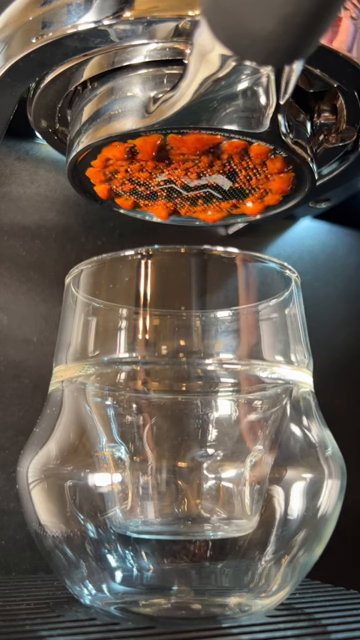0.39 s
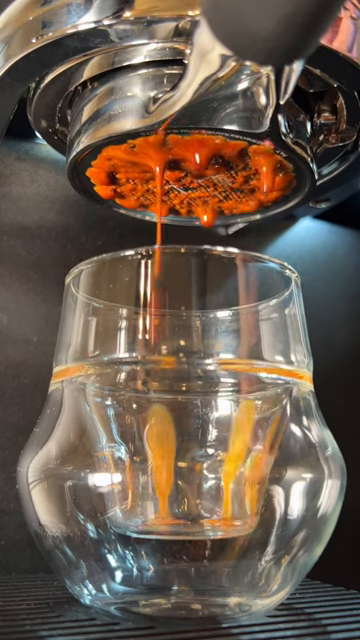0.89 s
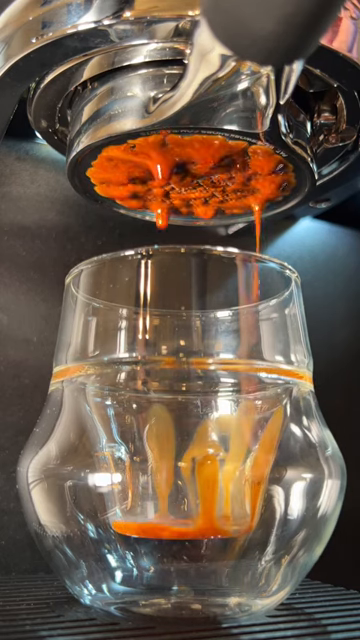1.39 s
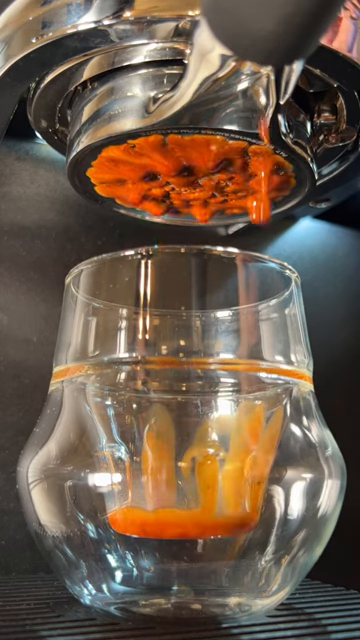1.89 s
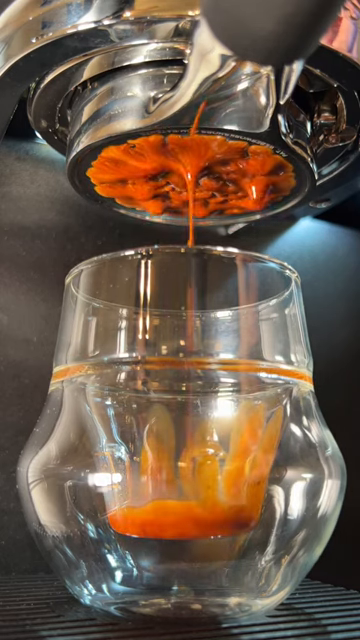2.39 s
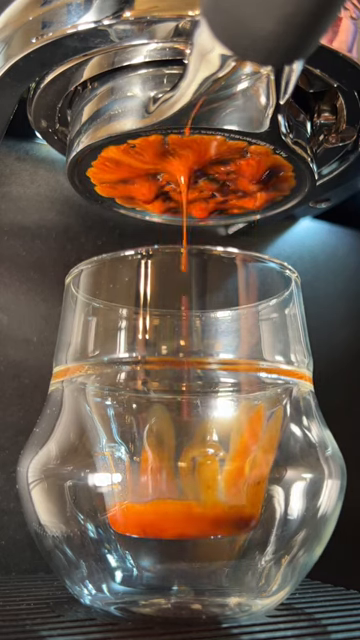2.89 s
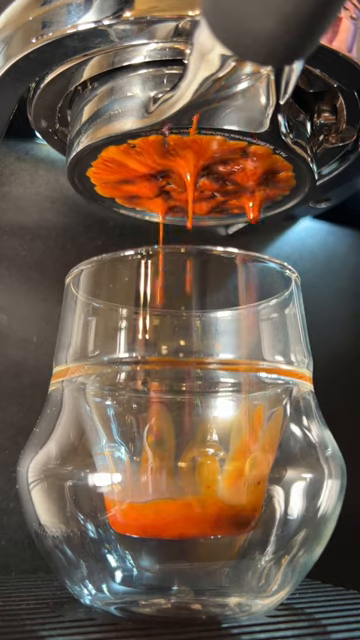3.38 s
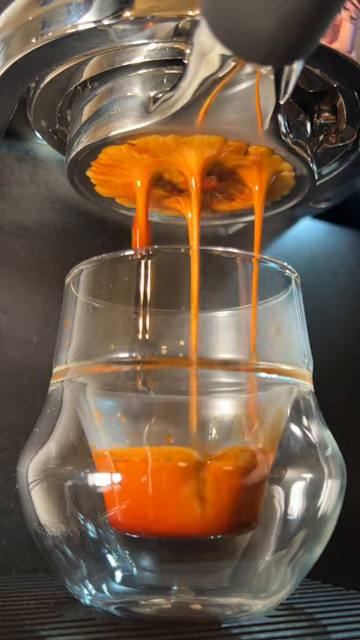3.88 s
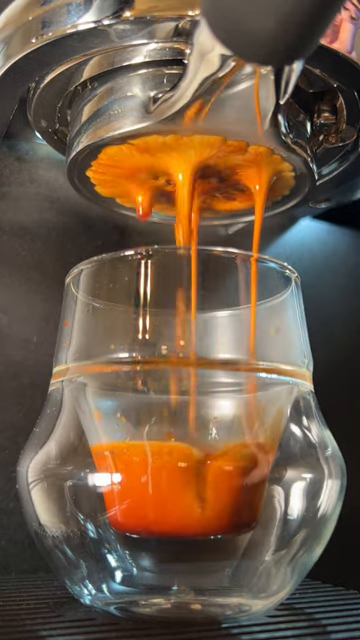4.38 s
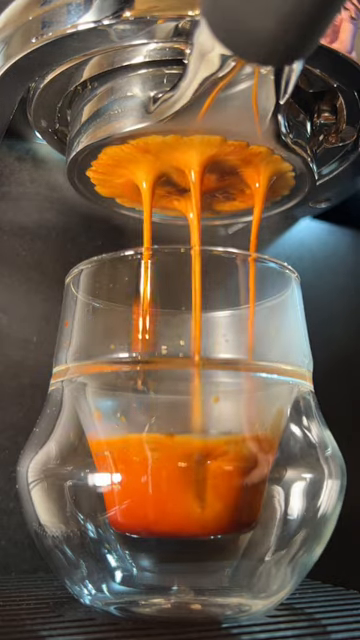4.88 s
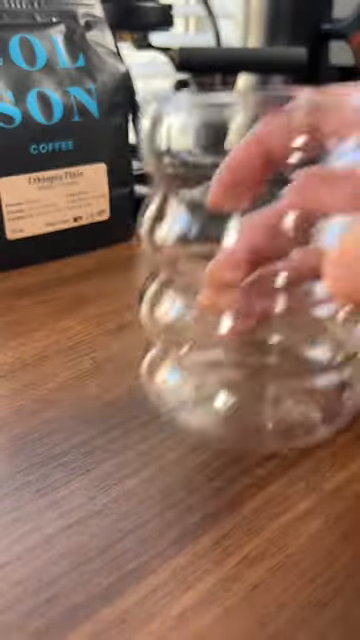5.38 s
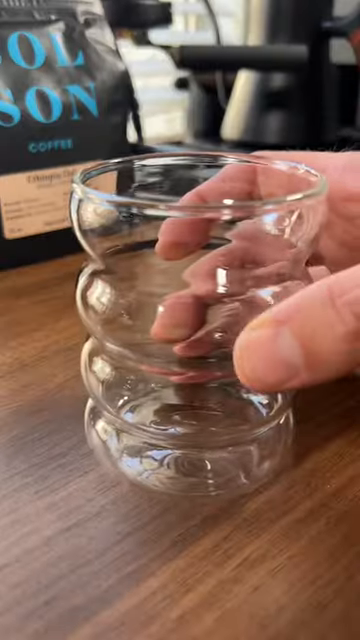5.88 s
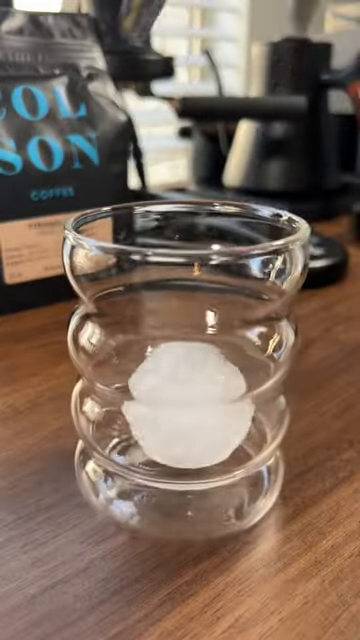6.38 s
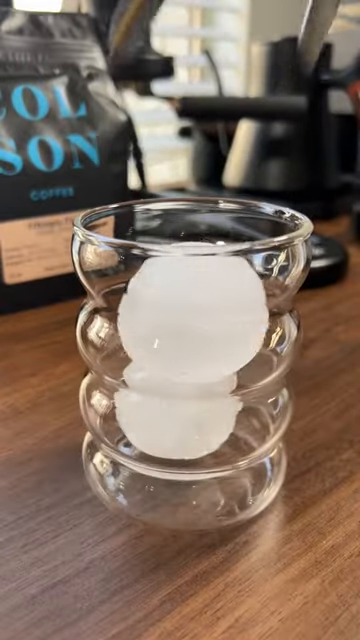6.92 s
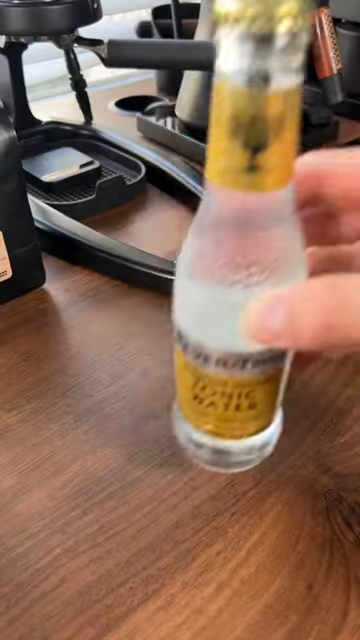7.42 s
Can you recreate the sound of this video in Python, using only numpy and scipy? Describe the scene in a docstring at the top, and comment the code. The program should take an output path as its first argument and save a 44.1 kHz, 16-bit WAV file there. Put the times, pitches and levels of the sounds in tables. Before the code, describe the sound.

An espresso pump drones close by, a wavering low hum with a throbbing metallic hiss and soft rumble, while coffee drips ring a cup. A hard cut leads to a quiet kitchen: an empty glass thumps onto a wooden table, then two ice balls drop in with loud thuds, glassy clinks, cracks and crunch. Finally only faint room air remains.

```python
"""Close to a mains-driven espresso pump, in three shots of differing tone: wavering hum, throbbing casing hiss, low
rumble, and drips ringing a cup. At 5.29 s a cut leads to a quiet kitchen, with the microphone near a wooden table.
An empty glass is set down and two ice balls are dropped in: blows thud the table modes, ring the glass, crack and
crunch; small contacts make the rolling ice hiss, low puffs of air reach the microphone, and delays return the room
faintly over shaped-noise air. At 7.22 s a last cut leaves only room air of another colour."""
import sys
import numpy as np
from scipy import signal
from scipy.fft import rfft, irfft, next_fast_len
from scipy.io import wavfile
from scipy.ndimage import uniform_filter1d

SR = 44100
rng = np.random.default_rng(int(sys.argv[2]) if len(sys.argv) > 2 else 0)


def rack_gain(trim_db):
    """Turn a fader trim in dB into the linear factor to multiply a signal by."""
    fader = np.asarray(trim_db, float)
    return 10 ** (fader / 20)


def bounce(signal):
    """Save signal as a 16-bit WAV file at the path given by the first command-line argument."""
    frames = np.transpose(np.atleast_2d(signal))
    limited = np.clip(frames, -1, 1)
    pcm = np.round(limited * 32767).astype(np.int16)
    wavfile.write(sys.argv[1], SR, pcm)


N = 332073
CUT_S, LAST_CUT_S = 5.287, 7.219   # the pump scene ends; the glass scene ends
ICE_IN_S = 6.5   # after this the table modes ring shorter and the cracks ring more


def rms_one(x):
    """Scale to rms 1."""
    return x / np.sqrt(np.mean(x ** 2) + 1e-20)


def in_time(rows, silent=-120):
    """Columns of a curve over time, one value a sample; silent is the value outside it (None holds the ends)."""
    s, *columns = np.transpose(rows)
    return [np.interp(np.arange(N) / SR, s, c, left=silent, right=silent) for c in columns]


def at_hz(points, hz):
    """Read a spectrum on a log frequency axis."""
    f, level = np.array(points)[:, :2].T
    return np.interp(np.log(hz), np.log(f), level)


def drift(rate):
    """Slow random wander of spread 1: noise through a two-pole lowpass at rate (Hz), drawn every 40 samples."""
    r = np.exp(-80 * np.pi * rate / SR)
    slow = signal.lfilter([1], [1, -2 * r, r * r], rng.standard_normal(N // 40 + 4002))[4000:]
    return np.interp(np.arange(N) / 40, np.arange(len(slow)), rms_one(slow - slow.mean()))


def ring(force, hz, t60):
    """Resonator: a unit click sets a decaying sine of height 1 ringing."""
    r, w = rack_gain(-60 / (t60 * SR)), 2 * np.pi * hz / SR
    return signal.lfilter([0, np.sin(w)], [1, -2 * r * np.cos(w), r * r], force + 1e-18)


def tint(x, spectrum):
    """Colour a sound by a spectrum, scaled so that white noise keeps its rms."""
    size = x.shape[-1]
    gain = rack_gain(at_hz(spectrum, np.maximum(np.fft.rfftfreq(size, 1 / SR), 1)))
    return irfft(rfft(x) * rms_one(gain), size)


def add(out, s, sound):
    """Mix a sound in at a time (s)."""
    i = round(s * SR)
    out[..., i:i + sound.shape[-1]] += sound[..., :N - i]


# likeness of left and right in spread noise: f/Hz, correlation
LIKENESS = [(30, 1), (300, 0.89), (1000, 0.3), (4000, 0.87), (12000, 0.69)]


def coloured(spectrum):
    """Stereo noise of a given spectrum, less alike left and right at some pitches; rms 1."""
    size = next_fast_len(N)
    hz = np.maximum(np.fft.rfftfreq(size, 1 / SR), 1)
    mid, side = rfft(rng.standard_normal((2, size))) * rack_gain(at_hz(spectrum, hz))
    alike = np.clip(at_hz(LIKENESS, hz), -1, 1)
    both = np.sqrt(1 + alike) * mid + np.sqrt(1 - alike) * side * [[1], [-1]]
    return rms_one(irfft(both, size)[:, :N])


# pump hum: multiple of the stroke rate, relative level/dB
HUM = [(1, -18.5), (2, -20), (3, -22), (4, -3), (5, -0.1), (6, -3.5), (7, -2.5), (8, -11), (9, -41),
       (10, -23), (11, -29), (12, -22.5), (13, -45), (14, -17), (15, -27), (16, -36), (17, -29),
       (18, -38.5), (19, -33), (20, -53), (21, -104), (23, -37), (24, -37)]
# pump load, swinging the hum and in part the hiss: t/s, level/dB
LOAD = [(0.0, 1.5), (0.09, 0), (0.37, -1.5), (0.72, -0.5), (1.26, -0.5), (1.9, -1), (3.3, -1.5),
        (3.8, -0.5), (4.13, 1.5), (4.54, -2), (4.87, 1), (5.28, 0.5)]
# three shots of the pump, each with its own tone: from t/s, then change in level/dB of the 5th, 6th, 7th-11th,
# higher multiples, and hiss
SHOTS = [(0, 1.3, -8, -2, -1.5, 2.8), (0.372, 0.4, -3.1, -2.4, -4, 1.7), (3.88, -2, -8, -9.5, -2, 0.55)]
# colour of the pump hiss as heard, with a steep treble cut above 13 kHz: f/Hz, relative level/dB per Hz
HISS = [(600, -2.5), (1200, -4), (2000, -6.5), (2800, -3), (3600, -3.5), (4900, -10), (6500, -4.5),
        (8300, -4), (10500, -9), (13000, -13), (13300, -30), (14500, -26), (15800, -24), (16100, -60)]
# resonances of the casing: f/Hz, width/Hz (each rings with t60 = 3.5 / width), relative level/dB
CASING = [(1540, 27, 4), (2790, 99, 5), (3263, 65, 7), (4160, 110, -6.5), (4260, 30, -4.5),
          (5880, 130, 1.5), (5530, 16, -31), (6420, 43, -12), (7280, 100, -1), (9000, 310, -13.5),
          (8760, 32, -1), (9000, 47, -14), (9400, 140, -2), (9800, 28, 10), (11500, 72, -13),
          (12200, 280, -6)]


def pump():
    """A piston on the mains: wavering multiples of the stroke rate, a valve tick and throbbing hiss in the casing."""
    stroke_hz, hum_db, hiss_level_db = 59.92, -46, -58.5
    fourth_follows, hiss_follows = 2.37, 0.59   # shares of the load's swing
    whistle_follows = 2.2   # extra swing by shot of the casing's lower resonances
    load_db, = in_time(LOAD, silent=None)
    start_s, *shifts = np.transpose(SHOTS)
    shot = np.searchsorted(start_s, np.arange(N) / SR, "right") - 1
    blended = uniform_filter1d(np.array(shifts)[:, shot], round(0.021 * SR), axis=1)
    fifth_db, sixth_db, middle_db, upper_db, hiss_db = blended
    turn = 2 * np.pi * stroke_hz * np.arange(N) / SR
    hum = np.zeros((2, N))
    own_shift_db = {4: (fourth_follows - 1) * load_db, 5: fifth_db, 6: sixth_db}
    for k, level_db in HUM:
        shift_db = own_shift_db.get(k, upper_db if k > 11 else middle_db * (k > 6))
        start, skew = rng.uniform(0, 2 * np.pi), rng.normal(0, 0.028)   # phases; skew parts left from right
        wobble = 0.18 * drift(3.7) * np.sqrt(k / 5)
        sway_db = (0.91 + 0.62 * (k > 5)) * drift(1.56)
        db = hum_db + level_db + load_db * (k > 3) + shift_db + sway_db
        hum += rack_gain(db) * np.sin(k * turn + start + wobble + skew * np.array([[1], [-1]]))
    throb = 1 + 0.043 * np.cos(turn) + 0.064 * np.cos(2 * turn + 1.9)
    stroke_count = np.floor(turn / (2 * np.pi) + 0.0018 * drift(14))   # slightly uneven timing
    strokes = np.diff(stroke_count, prepend=0) * rack_gain(2.4 * drift(30))
    t = np.arange(900) / SR
    tick_shape = rng.standard_normal(len(t)) * np.exp(-t / 0.012)   # alike on every stroke
    tick = signal.fftconvolve(strokes, tick_shape)[:next_fast_len(N)]
    drive = throb * coloured(HISS) + rack_gain(0.5) * rms_one(tint(tick, HISS))[:N]
    casing = drive.copy()
    for hz, width, db in CASING:
        level_db = db - 0.5 + whistle_follows * hiss_db * (hz < 3500) + 2 * drift(0.75)
        casing += rack_gain(level_db) * ring(drive, hz, 3.5 / width) * np.pi * width / SR
    return hum + rack_gain(hiss_level_db + hiss_db + hiss_follows * load_db + 0.29 * drift(24)) * rms_one(casing)


# drips: t/s, level/dB, favoured pitch f/Hz
DRIPS = [(0.885, -50, 900), (1.032, -45.5, 2060), (1.101, -52.5, 730), (1.251, -41, 676),
         (1.445, -48.5, 760), (1.5, -55, 2000), (1.595, -47, 1200), (1.704, -51, 1200),
         (1.786, -48.5, 1660), (1.867, -45.5, 926), (2.035, -39, 872), (2.08, -46, 940), (2.138, -46, 960),
         (2.231, -49.5, 1210), (2.356, -45, 846), (2.564, -46.5, 840), (2.626, -50.5, 1200),
         (2.712, -48, 700), (2.785, -51.5, 4760), (2.867, -45, 723), (3.028, -41, 810),
         (3.124, -46.5, 1200), (3.234, -45.5, 1220), (3.37, -45, 1170), (3.518, -42, 770),
         (3.637, -44.5, 693), (3.754, -41.5, 680), (3.838, -45, 1083), (3.875, -48, 760),
         (3.947, -49, 1140), (4.005, -55, 1200), (4.274, -45, 1200), (4.68, -48.5, 1200),
         (5.102, -50.5, 790)]
# modes of cup and drip tray: f/Hz, relative level/dB, t60/s
TRAY = [(435.6, 14.5, 0.27), (555, 2, 0.15), (722, 1, 0.11), (872, 3, 0.17), (1090, -29.5, 0.068),
        (1200, 2, 0.25), (1535, -2, 0.2), (1730, -1, 0.036), (2006, 2, .04), (2420, -6, .04)]


def drips():
    """Each drip is a soft splash that rings cup and tray, most near its own pitch; faint ones fall at random."""
    spatter = [(s, -55.5, hz) for s, hz in rng.uniform([.8, 500], [4.1, 1600], (44, 2))]
    out, t = np.zeros((2, N)), np.arange(round(.2 * SR)) / SR
    for s, db, hz in list(DRIPS) + spatter:
        splash = (t / .009) * np.exp(-t / 0.011) * rng.standard_normal(len(t))
        own_ring = rms_one(ring(splash, hz, 20 / hz))   # falls 60 dB in 20 cycles
        sound = rack_gain(-3.5 + 5.4 * np.log2(hz / 800)) * own_ring
        for mode_hz, mode_db, t60 in TRAY:
            octaves = np.log2(mode_hz / hz)
            lean_db = -18 * octaves if octaves > 0 else 7 * octaves   # modes above the splash pitch are hardly driven
            sound += rack_gain(mode_db + lean_db + rng.normal(0, 2.6)) * rms_one(ring(splash, mode_hz, t60))
        pan_db = 1.5 + 6 * rng.standard_normal()   # left above right
        level_db = db + 2.0 + np.array([[.5], [-.5]]) * pan_db
        add(out, s - .007, rack_gain(level_db) * sound / abs(sound).max())
    return out


# blows: t/s, table level/dB, glass ring level/dB, contact brightness level/dB, favoured table pitch f/Hz
BLOWS = [(5.5324, -6.5, -22, -32, 964), (5.5464, -10.5, -32, -37.5, 748), (5.6854, -31.5, -70.5, -85, 756),
         (5.9354, -70, -55.5, -71, 295), (6.035, -42, -50, -56, 780), (6.043, -32.5, -49, -48, 600),
         (6.0508, -17, -35, -25, 1300), (6.065, -22.5, -40, -42, 175.7), (6.0767, -18, -24, -27, 610),
         (6.0968, -17, -11, -27.5, 719), (6.1848, -15.5, -36, -13.5, 713), (6.1981, -22, -23, -20, 182.7),
         (6.2597, -15, -9, -28.5, 845), (6.2675, -16, -20, -41.5, 809), (6.2914, -14.5, -16, -31.5, 860),
         (6.3057, -15, -25.5, -40.5, 827), (6.328, -18.5, -23.5, -33.5, 600),
         (6.3671, -30.5, -23.5, -41.5, 178.4), (6.4564, -33.5, -47, -69, 818),
         (6.4892, -29.5, -49, -58, 834), (6.6034, -41, -67, -78, 490), (6.6198, -52, -47.5, -70.5, 173),
         (6.6395, -20.5, -21, -31, 900), (6.6566, -20.5, -40.5, -51.5, 195),
         (6.6655, -16, -15.5, -40.5, 180), (6.7081, -13, -6.5, -22.5, 723), (6.756, -19, -16.5, -31, 724),
         (6.7744, -26.5, -45, -41.5, 746), (6.8657, -31.5, -47, -49, 244), (6.9122, -40.5, -46, -47.5, 666),
         (6.9668, -35, -58, -56, 719), (6.996, -34, -61, -52.5, 250), (7.0097, -35.5, -38.5, -44, 1450),
         (7.0418, -45, -46.5, -44, 184), (7.0689, -34, -59, -61, 655), (7.1945, -46, -46.5, -41, 732)]
# modes of table top and glass foot: f/Hz, relative level/dB, t60/s before damping
TABLE = [(190.8, -3.5, 0.092), (253.7, -4, 0.59), (341, 0.5, 0.22), (506.7, -3, 0.14), (600, -0.5, 0.12),
         (748, 3, 0.22), (818, -0.5, 0.017), (944, -5, 0.028), (1044, -10.5, 0.11), (1222, -6, 0.084),
         (1426, -10.5, 0.078), (1750, -15.5, 0.16), (1900, -21.5, 0.1)]
# modes of the glass wall: f/Hz, relative level/dB, t60/s before damping
GLASS = [(2492, -5.5, .3), (3480, -9.5, 0.16), (6150, -21, 0.077), (7700, -8, 0.05), (8000, -5.5, 0.16),
         (9050, -3, 0.12), (15330, -26, .3)]
# crunch of ice: f/Hz, relative level/dB per Hz
CRUNCH = [(1000, -8), (2500, -6.5), (4500, -10.5), (6500, -10.5), (7800, 3.5), (9500, -5), (11300, -2.5),
          (11700, -34), (16000, -42.5)]


def blows():
    """Table thud, glass ring and icy crunch of each blow; the next touch chokes glass and crunch."""
    thud, clink, t = np.zeros(N), np.zeros(N), np.arange(round(.4 * SR)) / SR
    first_hz, _, first_t60 = TABLE[0]
    after = [row[0] for row in BLOWS[1:]] + [N / SR]
    for (s, table_db, ring_db, bright_db, table_hz), until in zip(BLOWS, after):
        push = rng.standard_normal(len(t)) * np.exp(-t / 0.0071)   # an uneven contact, a few ms long
        heave = np.sin(2 * np.pi * first_hz * t) * t * np.exp(-t / 0.0045)   # the whole top takes 4.5 ms to swing
        damp = 0.49 if s > ICE_IN_S else 1   # with ice in the glass the table rings shorter
        body = np.zeros(len(t))
        for hz, db, t60 in TABLE:
            lean_db = -10.6 * min(abs(np.log2(hz / table_hz)), 1.1)
            body += rack_gain(db + lean_db + rng.normal(0, 0.87)) * rms_one(ring(push, hz, t60 * damp))
        swing_db = table_db + 4.5 - 14.5   # the heavier the blow, the larger the share of the whole top's swing
        body = body / np.std(body[:700]) + rack_gain(swing_db) * rms_one(ring(heave, first_hz, first_t60 * damp))
        since_next = np.maximum(t - (until - s), 0)
        rest = 0.24 + 0.72 * np.exp(-since_next / 0.0013)   # the next touch damps the table in part
        add(thud, s, rack_gain(table_db - 2.5) * rest * body)
        choke = np.clip(t / 0.00047, 0, 1) * np.exp(-since_next / .002)
        # a bright contact favours the second glass mode
        second_db = 0.39 * np.clip(bright_db - ring_db + 11.5, -10, 20)
        for hz, db, t60 in GLASS:
            level_db = (ring_db if hz < 5000 else bright_db - 2.0) + db - 0.5 + rng.normal(0, 0.68)
            level_db += second_db * (3000 < hz < 5000)
            swing = np.sin(2 * np.pi * hz * rng.normal(1, .002) * t + rng.uniform(0, 2 * np.pi))
            add(clink, s, rack_gain(level_db - 60 * t / t60) * choke * swing)
        lumps_db = 3.5 * np.interp(t, t[::90], rng.standard_normal(len(t[::90])))   # ice breaks in uneven bits
        crunch = tint(rng.standard_normal(len(t)), CRUNCH)
        add(clink, s, rack_gain(bright_db - 0.3 + lumps_db - 60 * t / 0.073) * choke * crunch)
    return thud, clink


# hard cracks, glass on wood or ice on glass: t/s, level/dB, pitch f/Hz
CRACKS = [(5.533, 0, 3000), (6.052, -9, 2305), (6.06, 2.5, 3900), (6.076, -13, 2460), (6.185, 5, 3740),
          (6.259, 4.5, 3000), (6.292, -2.5, 3290), (6.305, -9.5, 2500), (6.33, -6.5, 2590),
          (6.645, -8.5, 2400), (6.653, 2, 2570), (6.708, -5.5, 2500), (6.754, -10.5, 2470),
          (7.012, -31, 3560), (7.069, -33, 2560), (7.194, -30.5, 3650)]
# colour of a crack: f/Hz, relative level/dB per Hz
CRACK = [(150, -17.5), (800, 2), (1700, -1.5), (2800, 0.5), (3600, -1.5), (5000, -6.5), (7800, -6),
         (11300, -26), (11800, -25.5), (16000, -35), (16500, -58.5)]
# ring of a crack against its snap [ratio of rms]: up to ICE_IN_S, after it
SNAP_RINGS = (0.62, 5.3)


def cracks():
    """A millisecond snap with a short ring at its own pitch."""
    out, t = np.zeros(N), np.arange(512) / SR
    for s, db, hz in CRACKS:
        snap = tint(rng.standard_normal(len(t)) * np.exp(-abs(t - .001) / 0.0012), CRACK)
        snap = rms_one(snap) + SNAP_RINGS[int(s > ICE_IN_S)] * rms_one(ring(snap, hz, 0.0063))
        add(out, s - .001, rack_gain(db - 3.0) * snap / abs(snap).max())
    return out


# ice sliding on the wall: t/s, level/dB that the hiss, glass song and table roll follow
SLIDE = [(5.93, -86), (5.99, -79), (6.09, -58.5), (6.16, -49.5), (6.24, -49.5), (6.36, -48), (6.45, -63.5),
         (6.62, -71), (6.99, -68), (7.05, -69), (7.18, -90.5)]
# colour of the sliding hiss: f/Hz, relative level/dB per Hz
SLIDE_COLOUR = [(1760, -34), (3000, -6), (3360, 10), (4440, -1.5), (8280, -2.5), (9800, -0.5),
                (11000, -24.5), (12000, -37), (16000, -21)]


def slide():
    """Dense small contacts of rolling ice: they drive the table modes, keep the glass singing and hiss."""
    slide_db, = in_time(SLIDE)
    touches = rng.random(N) < 2500 / SR   # about 2500 a second
    heights = rack_gain(0.95 * np.minimum(rng.exponential(1, N), 4))
    grit = touches * heights * rng.choice([-1, 1], N)
    body = sum(rack_gain(db) * ring(grit, hz, t60 * 0.24) for hz, db, t60 in TABLE)
    song = sum(rack_gain(db) * ring(grit, hz, t60 * .6) for hz, db, t60 in GLASS)
    hiss = rack_gain(7.0) * rack_gain(2.5 * drift(40)) * coloured(SLIDE_COLOUR)   # its level flickers
    roll_db = -43 + 0.99 * (slide_db + 64)
    return rack_gain(roll_db) * rms_one(body), rack_gain(slide_db) * (hiss + rack_gain(-4.5) * rms_one(song))


# air pushed out by the falling ball: t/s, level/dB, f/Hz
PUFFS = [(6.066, -13.5, 24.2), (6.657, -24.5, 25.7)]


def puffs():
    """One dying low swing of air at the microphone."""
    out, t = np.zeros(N), np.arange(round(.2 * SR)) / SR
    for s, db, hz in PUFFS:
        add(out, s, rack_gain(db) * np.sin(2 * np.pi * hz * t) * np.exp(-t / 0.0055))
    return out


def kitchen(x):
    """The room around the table: eight feedback delays a side, duller on every round."""
    t60_s, wall_cut_hz = 0.49, 10100
    first = int(CUT_S * SR)
    size = next_fast_len(N - first + SR)
    z = np.exp(-2j * np.pi * np.fft.rfftfreq(size))   # a delay of one sample
    dull = np.exp(-2 * np.pi * wall_cut_hz / SR)
    walls = np.zeros((2, len(z)), complex)
    for k, lag in enumerate((rng.uniform(.009, .035, 16) * SR).astype(int)):
        loop = rack_gain(-60 * lag / SR / t60_s) * (1 - dull) / (1 - dull * z) * z ** lag
        walls[k % 2] += loop / (1 - loop) * (-1) ** (k // 2)
    wet = irfft(rfft(x[first:], size) * walls, size)[:, :N - first]
    return np.pad(wet, ((0, 0), (first, 0)))


# rumble under the pump: f/Hz, relative level/dB per Hz
RUMBLE = [(13, -53), (22, -44), (59, -13), (185, -13), (219, -4), (299, -3.5), (349, -6), (421, 3),
          (523, -5), (846, -28), (900, -8.5), (1170, -42), (1980, -120)]


def rumble():
    """Low shaped noise under the pump, slowly swaying in level."""
    return rack_gain(-60.5 + 4.9 * drift(1.5)) * coloured(RUMBLE)


# air of the kitchen at the table: f/Hz, relative level/dB per Hz
ROOM_AIR = [(15, -45.5), (25, -21.5), (65, -8.5), (151, -24), (327, -16.5), (391, -46), (533, -29),
            (695, -52.5), (1760, -41.5), (5000, -64.5), (6500, -104), (11000, -120)]


def room_air():
    """Shaped noise of the quiet kitchen, slightly stronger on the left."""
    return rack_gain(-53.5 + 1.1 * drift(0.7)) * coloured(ROOM_AIR) * rack_gain([[.8], [-.8]])


# air after the last cut: f/Hz, relative level/dB per Hz
LAST_AIR = [(15, -42.5), (25, -20), (53, -11.5), (144, -19.5), (221, -13), (305, -16.5), (469, -42),
            (1410, -44), (1710, -32.5), (2360, -54), (11800, -63.5), (13900, -46), (15500, -69)]


def last_air():
    """Shaped noise of the closing room air, slightly stronger on the left."""
    return rack_gain(-57 + 1.86 * drift(3.2)) * coloured(LAST_AIR) * rack_gain([[1.5], [-1.5]])


def scene():
    """The pump shots, a cut to the table, a last cut to room air."""
    t = np.arange(N) / SR
    later = np.clip((t - CUT_S) / 0.00083, 0, 1)
    last = np.clip((t - LAST_CUT_S) / 0.0054, 0, 1)
    machine = (pump() + rumble() + drips()) * rack_gain([[.2], [-.2]])
    thud, clink = blows()
    rolling, hiss = slide()
    stiff = signal.butter(6, 168, "high", fs=SR, output="sos")   # the table radiates little below its first mode
    legs = signal.butter(2, [55, 110], "band", fs=SR, output="sos")   # what the legs pass to the microphone's stand
    shaken = rack_gain(-9.0) * signal.sosfilt(legs, thud + rolling)
    thud = signal.sosfilt(stiff, thud + rolling)
    clink = clink + cracks()
    near = (thud + shaken + puffs()) * rack_gain([[1.8], [-1.8]]) + clink * rack_gain([[-.3], [.3]]) + hiss
    # the wide table top reaches the two ports unalike in the low mids
    low_mids = signal.butter(2, [280, 1300], "band", fs=SR, output="sos")
    width = signal.sosfilt(low_mids, np.roll(thud, round(.0016 * SR)))
    near = near + rack_gain(-9.0) * width * [[1], [-1]]
    table = near + rack_gain(-21.5) * kitchen(thud + clink) + room_air()
    return (1 - later) * machine + later * (1 - last) * table + last * last_air()


def low_pass(x):
    """Removes everything above the highest recorded frequency."""
    return signal.sosfilt(signal.butter(12, 16370, fs=SR, output="sos"), x)


def record(dry):
    """A slightly late limiter ducks what follows a sharp peak, then peaks are rounded."""
    limit_db, squeeze, release_db_s, attack_s = -6.5, 0.55, 600, 0.002
    fall = release_db_s * np.arange(N) / SR
    level_db = 20 * np.log10(abs(dry).max(axis=0) + 1e-9)
    held_db = np.maximum.accumulate(level_db + fall) - fall   # jumps up at once, falls at the release rate
    over_db = np.maximum(held_db - limit_db, 0)
    r = np.exp(-1 / (attack_s * SR))
    ducked = dry * rack_gain(-squeeze * signal.lfilter([1 - r], [1, -r], over_db))
    return low_pass(1.029 * np.tanh(ducked / 1.2))


dry = scene()
out = record(dry)
bounce(out)
```